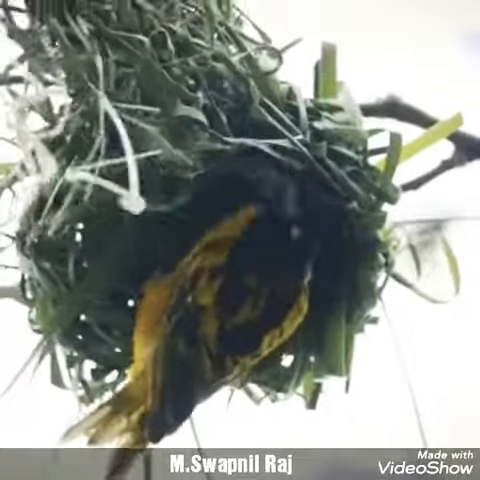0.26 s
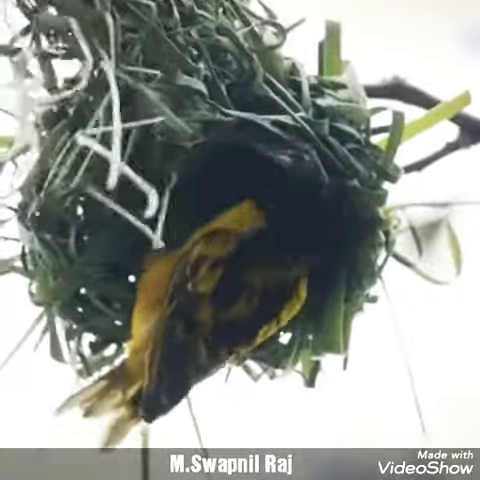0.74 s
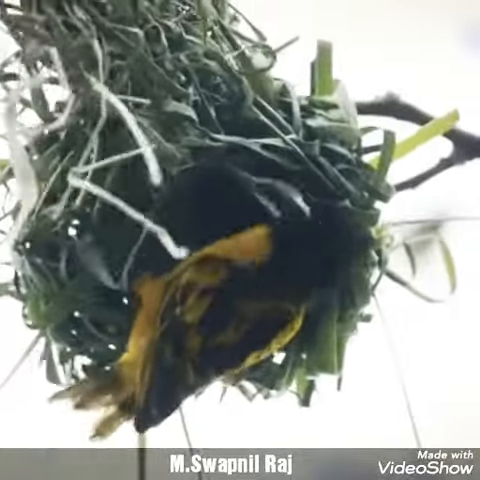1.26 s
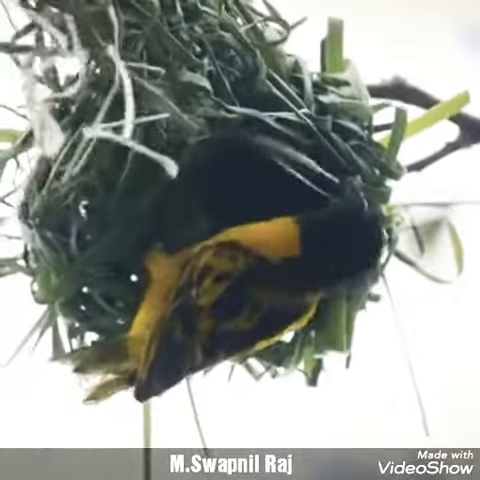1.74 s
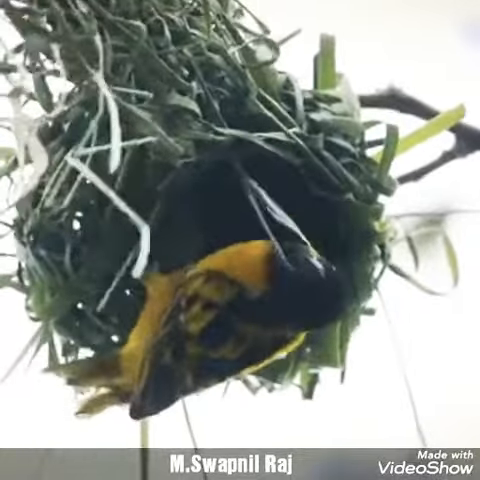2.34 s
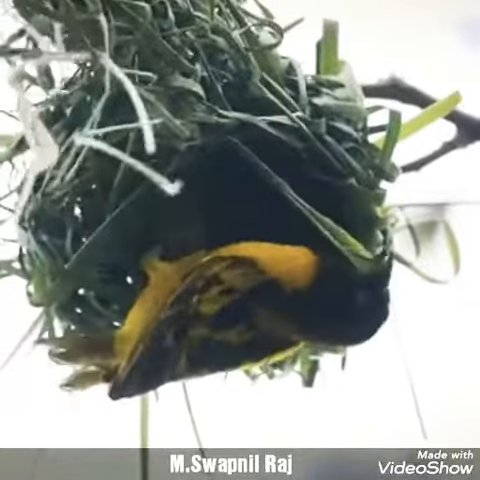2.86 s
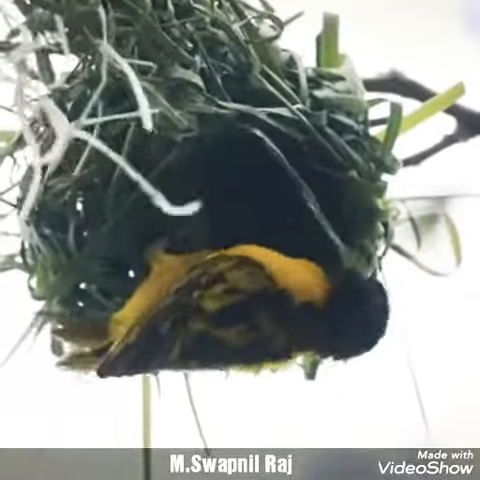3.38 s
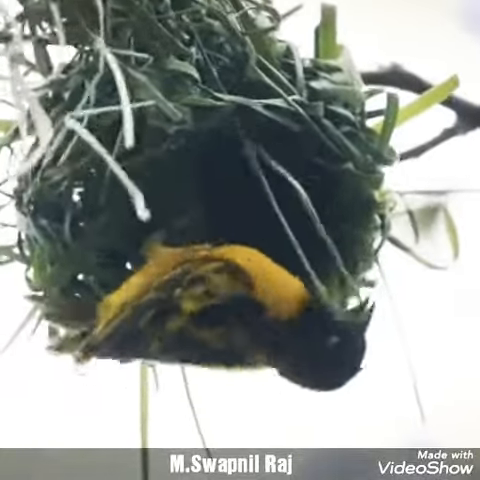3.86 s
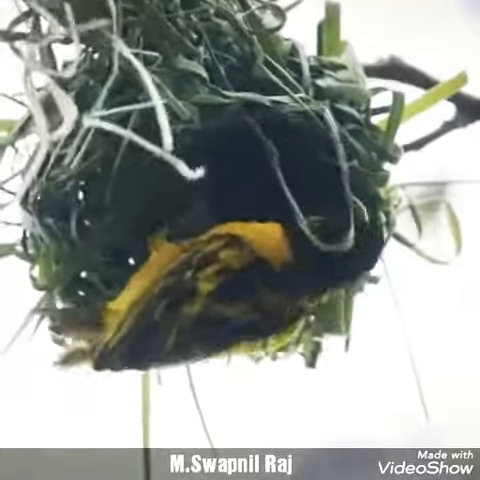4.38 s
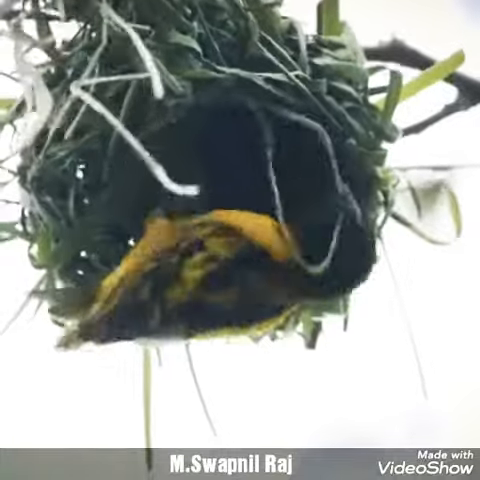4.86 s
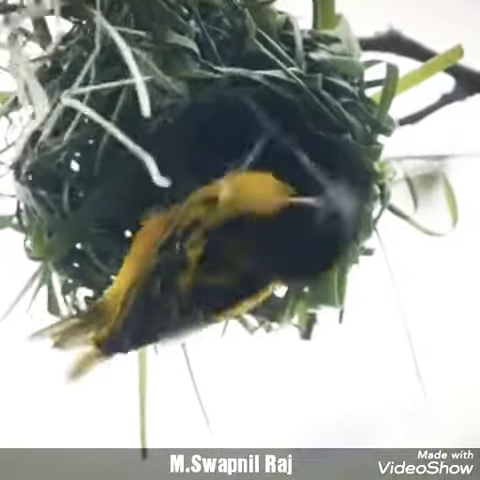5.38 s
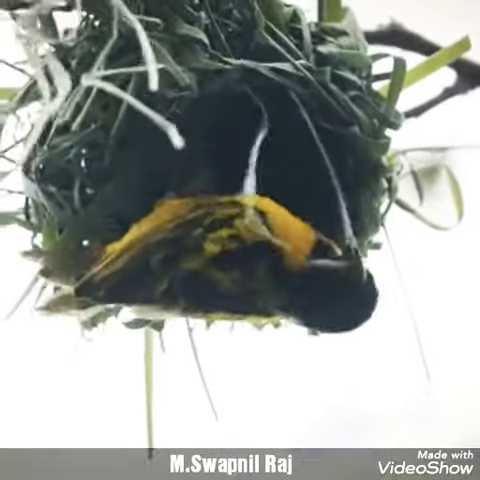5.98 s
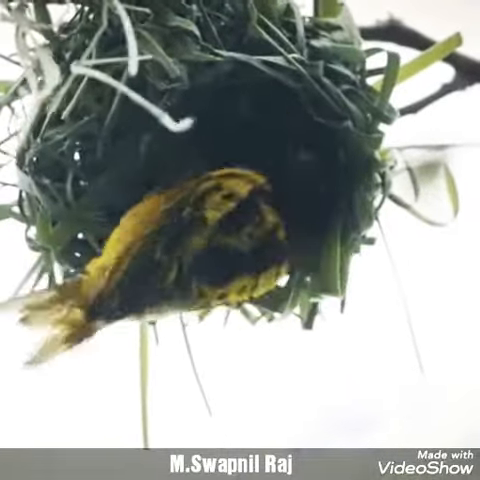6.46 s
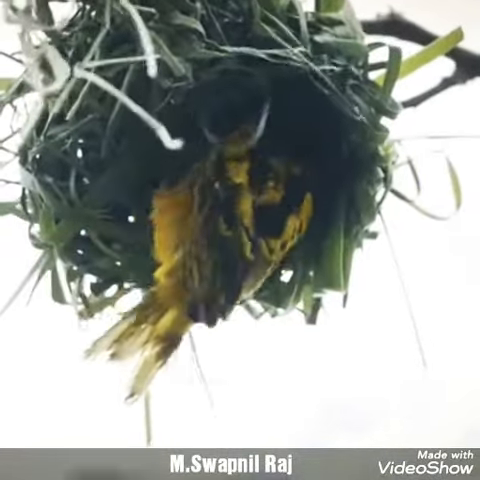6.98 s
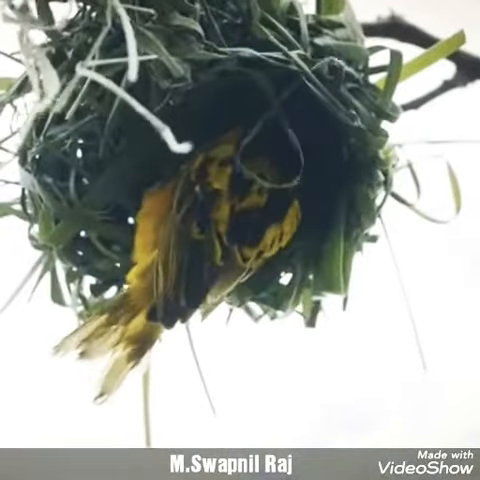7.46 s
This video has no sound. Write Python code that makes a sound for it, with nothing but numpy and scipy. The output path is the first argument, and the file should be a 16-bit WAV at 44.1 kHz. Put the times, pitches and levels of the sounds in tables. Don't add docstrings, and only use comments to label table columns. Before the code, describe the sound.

A busy colony of small weaver birds, heard outdoors in a tree over dull town rumble and far twittering. From 0 to 1.4 s, thin falling chirps, ticks and scratchy rasps squabble while a distant motor hum fades, gone by about 1.9 s. Between 1.4 and 1.9 s come four pure, nearly level whistles, rising slightly from one to the next. From 2 to 3.5 s reedy chirps and hoarse bursts tumble together, far birds swell near 2.9 s, and a short wing puff snaps at 3.1 s, another at 3.7 s. A thin whistle wavers from 3.8 to 4.2 s. Rasps, ticks and short whistles crowd in until 6 s. From 6.2 to 7.1 s, five brighter whistles each break into a shake and rasp; scratchy chirps close by 7.7 s. Leaves briefly echo the calls. Everything is on the left; the right has faint hiss.

```python
import sys
import numpy as np
from scipy import signal
from scipy.io import wavfile
from scipy.ndimage import uniform_filter1d

SR = 44100
rng = np.random.default_rng(int(sys.argv[2]) if len(sys.argv) > 2 else 0)


def decibels_to_gain(level_db):
    exponent = np.asarray(level_db, float) / 20
    return 10 ** exponent


def output_pcm(signal):
    pcm = np.clip(np.atleast_2d(signal).T, -1, 1) * 32767
    wavfile.write(sys.argv[1], SR, np.round(pcm).astype(np.int16))


N = 340893


def rms_one(x):
    return x / np.sqrt(np.mean(x ** 2) + 1e-20)


def drift(rate_hz, size):
    r = np.exp(-2 * np.pi * rate_hz / SR)
    warm_up = 3000
    noise = rng.standard_normal(size + warm_up)
    return rms_one(signal.lfilter([1], [1, -2 * r, r * r], noise)[warm_up:])


def band(x, low_hz, high_hz):
    sections = signal.butter(2, [low_hz, min(high_hz, .45 * SR)], "band", fs=SR, output="sos")
    return signal.sosfilt(sections, x)


def add(out, start_s, x):
    at = max(round(start_s * SR), 0)
    out[at:at + len(x)] += x[:N - at]


def swell(size, rise_s, fall_s):
    t = np.arange(size) / SR
    ramp = np.minimum(t / rise_s, t[::-1] / fall_s)
    return np.sin(np.pi / 2 * np.clip(ramp, 0, 1)) ** 2


def sweep(hz):
    return 2 * np.pi * np.cumsum(hz) / SR


HISS_DB = -63.5


def hiss():
    white = rng.standard_normal(N)
    coloured = white + decibels_to_gain(3) * band(white, 6100, 18000) + decibels_to_gain(5) * band(white, 12, 70)
    return decibels_to_gain(HISS_DB - 2.5) * coloured


# pitch_hz, level_db (per Hz)
TOWN_SPECTRUM = [(15, -58), (25, -24), (59, -19), (129, -2.5), (233, 3), (349, 1), (1380, -11.5),
                 (2170, -11), (3000, -16.5), (6050, -14), (7700, -22.5), (8810, -12), (13500, -38),
                 (15500, -34.5)]
RUMBLE_DB = -41.5


def rumble(patchy_db=1.75):
    out = 0
    edges_hz = 22 * 2 ** (np.arange(30) / 3)
    white = rng.standard_normal((2, N))
    hz, db = np.transpose(TOWN_SPECTRUM)
    for k, (low, high) in enumerate(zip(edges_hz, edges_hz[1:])):
        level_db = np.interp(np.log(low * high) / 2, np.log(hz), db)
        flicker = np.repeat(drift(300, size=N // 50 + 1), 50)[:N]
        out = out + decibels_to_gain(level_db + patchy_db * flicker) * band(white[k % 2], low, high)
    return decibels_to_gain(RUMBLE_DB + 5.5) * rms_one(out)


def hum():
    fade = np.clip(1 - (np.arange(N) / SR / 1.9) ** 2, 0, 1)
    phase = sweep(290 * (1 + .012 * drift(8, size=N)))
    level = decibels_to_gain(-43.5 + 1.2 * drift(6, size=N))
    return level * fade * (np.sin(phase) + decibels_to_gain(-7) * np.sin(2 * phase))


ECHO_T60_S, ECHO_DB = 0.17, -10.5


def leaves(x):
    t = np.arange(round(.4 * SR)) / SR
    tail = band(rng.standard_normal(len(t)), 1200, 7560)
    tail = tail * decibels_to_gain(-60 * t / ECHO_T60_S) * np.clip(t / 0.0026, 0, 1)
    return signal.fftconvolve(x, tail / np.sqrt(np.sum(tail ** 2)))[:N]


# start_s, level_db
FAR_BIRDS = [
    (0.0, -45),
    (2.86, -41),
    (3.77, -52.5),
    (3.9, -49.5),
    (5.53, -38.5),
    (5.73, -50),
    (6.63, -39.5),
    (6.85, -64),
    (7.73, -39),
]


def twitter(count=1500):
    out = np.zeros(N)
    for when, pitch, bend, span, size_db in rng.random((count, 5)):
        u = np.linspace(0, 1, round((0.00626 + 0.0312 * span ** 2) * SR))
        glide = 1 + .8 * (bend - .5) * u - .18 * (2 * u - 1) ** 2
        hz = 2800 * 2.6 ** pitch ** 1.2 * glide
        add(out, when * N / SR, decibels_to_gain(6.3 * size_db) * np.sin(np.pi * u) * np.sin(sweep(hz)))
    start_s, level_db = np.transpose(FAR_BIRDS)
    level_db = np.interp(np.arange(N) / SR, start_s, level_db)
    return decibels_to_gain(level_db + 4.5) * rms_one(out + 9.2 * leaves(out))


# start_s, level_db
WING_SNAPS = [
    (3.056, -26.5),
    (1.8, -36),
    (3.726, -33),
    (1.9, -36),
]


def snaps(length_s=.024):
    out = np.zeros(N)
    for start_s, level_db in WING_SNAPS:
        puff = band(rng.standard_normal(round(length_s * SR)), 800, 7100)
        puff = rms_one(band(puff, 700, 9500))
        add(out, start_s, decibels_to_gain(level_db) * swell(len(puff), 0.0033, 0.015) * puff)
    return out


# start_s, pitch_hz, level_db
LONG_WHISTLE = [
    (3.81, 3100, -56),
    (3.82, 3090, -48),
    (3.936, 3038, -39),
    (3.956, 2980, -37),
    (3.99, 2940, -31),
    (4.002, 3090, -39),
    (4.038, 3002, -41),
    (4.158, 2934, -37),
    (4.195, 2950, -43),
]


def whistle():
    start_s, pitch_hz, level_db = np.transpose(LONG_WHISTLE)
    t, out = np.arange(start_s[0], start_s[-1], 1 / SR), np.zeros(N)
    phase = sweep(np.interp(t, start_s, pitch_hz) * (1 + .005 * drift(120, size=len(t))))
    level = decibels_to_gain(np.interp(t, start_s, level_db) + 5.5 + .8 * drift(60, size=len(t)))
    add(out, start_s[0], level * swell(len(t), .01, .008) * np.sin(phase))
    return out


# start_s, pitch_hz (middle), level_db
TICKS_UP = [(0.46, 3800, -30.5), (1.306, 5700, -32), (2.698, 4300, -27), (2.771, 4300, -28),
            (3.23, 4000, -35), (3.144, 5800, -28), (.21, 4700, -32), (3.312, 4570, -29), (4.429, 5500, -38),
            (4.521, 4700, -36), (3.7, 4800, -30), (5, 4500, -31.5), (4.89, 5100, -30.5), (4.947, 5000, -26),
            (5.11, 4530, -33), (5.115, 5800, -34), (5.172, 4700, -21.5), (5.357, 4100, -32.5),
            (5.8, 4700, -31), (5.557, 4800, -36), (6.4, 5500, -31), (1.005, 5500, -32), (1.335, 6600, -37),
            (5.642, 5200, -27.5), (6.9, 5320, -28.5), (2.258, 5200, -31), (2.527, 6900, -38),
            (2.419, 6700, -39), (4.311, 5000, -37), (4.612, 5500, -38), (7.537, 6100, -35),
            (7.357, 4330, -29), (5.713, 4700, -34)]
# start_s, pitch_hz (middle), level_db
TICKS_DOWN = [(1.015, 5400, -33), (1.239, 6900, -30), (1.347, 6500, -34), (1.356, 6200, -31.5),
              (1.376, 6400, -36), (2.609, 6750, -41.5), (2.268, 5460, -31.5), (4.399, 4000, -32),
              (4.705, 5240, -30), (3.153, 5540, -31.5), (3.174, 5700, -40), (4.956, 4440, -37),
              (4.963, 3640, -32), (5.18, 5130, -30), (5.347, 3900, -31), (5.479, 5460, -37),
              (5.521, 6500, -37), (6.372, 4000, -34.5)]
UP_HZ_PER_MS, DOWN_HZ_PER_MS = 325, -310


def flicks(length_s=0.008):
    rows = [(s, hz, UP_HZ_PER_MS, db) for s, hz, db in TICKS_UP]
    rows += [(s, hz, DOWN_HZ_PER_MS, db) for s, hz, db in TICKS_DOWN]
    out, t = np.zeros(N), np.arange(-length_s / 2, length_s / 2, 1 / SR)
    for start_s, pitch_hz, slope, level_db in rows:
        phase = 2 * np.pi * (pitch_hz * t + 500 * slope * t ** 2)
        tone = np.sin(phase) + decibels_to_gain(-17.0) * np.sin(2 * phase)
        level = decibels_to_gain(level_db + 7.0 + 2.5 * drift(400, size=len(t)))
        add(out, start_s - length_s / 2, level * np.hanning(len(t)) * tone)
    return out


SCOOP, SCOOP_S, SCOOP_RISE_S = .5, .0038, .012
SWELL_DB, SWELL_PEAK = 3.5, 0.29


def notes(rows, scooped, octave_db, third_db, waver, flutter_db, edge_s=0.0055, peak=SWELL_PEAK):
    out, wobble, breath = np.zeros(N), drift(250, size=N), drift(44, size=N)
    for start_s, length_s, start_hz, middle_hz, end_hz, level_db in rows:
        size = round((length_s + edge_s) * SR)
        u = np.linspace(-1, 1, size)
        tilt = (end_hz - start_hz) / 2
        bow = (end_hz + start_hz) / 2 - middle_hz
        hz = middle_hz + tilt * u + bow * u ** 2
        rise_s = edge_s
        if scooped:
            rise_s = SCOOP_RISE_S
            hz = hz * (1 - SCOOP * np.exp(-np.arange(size) / SR / SCOOP_S))
        at = min(round(start_s * SR), N - size)
        phase = sweep(hz * (1 + waver * wobble[at:at + size]))
        overtones = decibels_to_gain(octave_db) * np.sin(2 * phase)
        overtones += decibels_to_gain(third_db) * np.sin(3 * phase) + decibels_to_gain(third_db - 2) * np.sin(4 * phase)
        tone = np.sin(phase) + overtones * (middle_hz < 4600)
        effort_db = flutter_db * breath[at:at + size] - SWELL_DB * (u - peak) ** 2
        envelope = decibels_to_gain(level_db + 7.0 + effort_db) * swell(size, rise_s, 0.41 * edge_s)
        add(out, start_s - rise_s / 2, envelope * tone)
    return out


def shaped(rows, shape):
    return [(s, length, *(hz * np.array(shape)), db) for s, length, hz, db in rows]


def slid(rows):
    return [(s, length, start, (start + end) / 2, end, db) for s, length, start, end, db in rows]


# start_s, length_s, pitch_hz (top), level_db
THIN_ARCHES = [
    (1.881, 0.055, 4380, -34),
    (5.428, .07, 7400, -37),
    (5.252, 0.0094, 4900, -26),
    (5.334, 0.02, 3640, -34),
    (6.545, 0.0136, 3700, -35),
]
# start_s, length_s, pitch_hz (middle), level_db
THIN_HOOKS = [
    (.234, 0.056, 4110, -34),
    (4.275, 0.023, 3310, -38),
    (4.997, 0.0164, 5200, -34),
    (5.021, 0.0134, 5120, -31.5),
    (4.333, 0.013, 4850, -37.5),
    (4.524, 0.0208, 4940, -33),
    (4.585, 0.027, 3510, -45),
    (5.561, 0.0146, 5320, -29),
    (7.43, 0.0166, 5280, -34.5),
    (7.671, 0.0176, 5700, -27.5),
]
# start_s, length_s, start_hz, end_hz, level_db
FALLING_SLIDES = [(.001, .079, 4600, 3600, -37.5), (.14, .054, 4350, 3680, -44),
                  (.173, .03, 7600, 6300, -48), (.288, 0.071, 4620, 3530, -35.5),
                  (.589, .043, 4100, 3390, -40), (.96, .035, 4270, 3600, -42),
                  (1.22, .035, 5560, 4080, -39), (1.931, 0.036, 4200, 3000, -42),
                  (2.28, 0.12, 5550, 4940, -30), (2.776, .016, 5600, 3980, -27),
                  (4.892, .025, 4350, 3860, -33), (5.117, 0.023, 4300, 3900, -29.5),
                  (5.268, 0.014, 3750, 3190, -25), (5.584, .025, 4350, 3810, -33),
                  (6.965, .007, 5600, 4300, -34), (6.971, 0.03, 4170, 3750, -29.5),
                  (7.15, .045, 3300, 3000, -46), (7.478, .018, 2900, 1700, -41),
                  (7.484, .014, 7000, 5200, -39), (6.434, 0.0085, 5000, 4220, -29)]
# start_s, length_s, start_hz, end_hz, level_db
STRAIGHT_STROKES = [(4.75, .11, 1820, 1800, -54), (1.263, .025, 3700, 3800, -41),
                    (1.485, .036, 6300, 7000, -37), (2.59, 0.0296, 4300, 4700, -40),
                    (2.572, .042, 5300, 5200, -40), (2.678, .007, 2900, 3700, -25.5),
                    (4.782, .03, 3500, 3450, -40), (5.2, .45, 2750, 2700, -46), (6.135, 0.04, 3400, 3750, -40),
                    (6.487, 0.067, 3950, 4700, -41.5), (5.668, .04, 6750, 5900, -37),
                    (6.672, .062, 3850, 3950, -39.5), (7.333, .02, 3500, 3400, -30.5),
                    (7.222, 0.062, 3700, 3950, -39.5), (1.805, 0.081, 3900, 4400, -47),
                    (2.18, .035, 4900, 4500, -44), (2.4, .045, 3250, 3150, -47), (4.425, .02, 4400, 4800, -38),
                    (4.445, .012, 4800, 6600, -41), (4.457, 0.031, 6750, 6650, -41),
                    (7.508, .016, 2100, 2350, -40), (7.661, .012, 3700, 5100, -37.5),
                    (7.67, .016, 9200, 8800, -37), (2.5, 0.0097, 2700, 4700, -37),
                    (2.04, .012, 6500, 8000, -40), (6.482, .012, 5000, 5800, -30.5),
                    (7.016, 0.011, 3500, 6400, -33),
                    (0.91, 0.016, 4000, 5600, -37), (0.941, .02, 6800, 7140, -39),
                    (1.018, 0.033, 3500, 4180, -39), (1.052, 0.038, 4250, 4170, -40),
                    (1.285, 0.04, 3900, 4400, -42.5), (.068, 0.019, 3500, 3000, -40.5),
                    (.2, .018, 3300, 3100, -41), (0.419, .012, 3900, 3200, -37),
                    (0.617, .012, 3800, 3300, -40), (2.627, .017, 2950, 5520, -32.5),
                    (2.645, 0.0173, 5500, 4100, -26), (2.645, .015, 3500, 4130, -33),
                    (2.673, .006, 4000, 2870, -30), (2.683, 0.0042, 3700, 2610, -32),
                    (2.66, 0.031, 4740, 4700, -35), (2.71, 0.033, 4300, 4130, -34),
                    (3.101, .06, 3050, 2700, -48), (3.196, .008, 3200, 4800, -37),
                    (3.202, .006, 4800, 5250, -38), (4.113, 0.019, 2900, 3580, -40),
                    (4.171, 0.031, 1250, 1700, -46), (5.059, .018, 2120, 3610, -37),
                    (5.074, 0.011, 3690, 3300, -37), (5.088, 0.01, 2780, 3210, -39),
                    (5.476, 0.011, 3170, 5400, -33), (5.52, .03, 1970, 3190, -48),
                    (5.568, .01, 4530, 4950, -33), (5.646, 0.011, 5500, 2990, -35),
                    (5.699, .015, 3290, 5480, -34), (5.745, .015, 3570, 5070, -40),
                    (5.982, .015, 4150, 5400, -33), (6.152, .02, 1900, 3600, -40)]
# start_s, length_s, pitch_hz (top), level_db
FALLING_ARCHES = [
    (3.367, .032, 3350, -31),
    (3.918, 0.052, 1610, -44.5),
]
PEEP_SHAPE, HOOK_SHAPE, DROOP_SHAPE = (0.78, 1.001, 0.79), (.78, 1.001, 1.06), (.88, .98, .8)


def thin_calls():
    rows = shaped(THIN_ARCHES, PEEP_SHAPE) + shaped(THIN_HOOKS, HOOK_SHAPE)
    rows += slid(FALLING_SLIDES + STRAIGHT_STROKES) + shaped(FALLING_ARCHES, DROOP_SHAPE)
    return notes(rows, False, octave_db=-19, third_db=-38, waver=.013, flutter_db=1.8)


# start_s, length_s, pitch_hz (top), level_db
REEDY_ARCHES = [(.557, 0.036, 3180, -38), (.759, 0.036, 3114, -33.5), (1.206, 0.025, 3370, -29),
                (2.029, 0.026, 3365, -31.5), (2.447, 0.036, 3290, -33.5), (2.711, 0.034, 3350, -32),
                (2.822, 0.034, 2756, -37.5), (2.893, 0.042, 3000, -35.5), (3.726, .018, 3080, -50),
                (6.048, 0.039, 3310, -33.5), (7.194, .04, 3135, -33.5), (7.352, 0.038, 3230, -35),
                (6.342, .04, 2980, -41.5)]
# start_s, length_s, pitch_hz (middle), level_db
REEDY_CLIMBS = [
    (1.124, 0.029, 2615, -34),
    (2.36, 0.03, 2820, -36),
    (3.27, .038, 2730, -38),
]
ARCH_SHAPE = (.94, 0.99, .73)


def reedy_chirps():
    arches = shaped(REEDY_ARCHES, ARCH_SHAPE)
    climbs = shaped(REEDY_CLIMBS, HOOK_SHAPE)
    out = notes(arches, True, octave_db=-1, third_db=-22, waver=.007, flutter_db=1.5)
    return out + notes(climbs, False, octave_db=2, third_db=-19, waver=.012, flutter_db=3)


# start_s, length_s, pitch_hz, level_db
PURE_WHISTLES = [(.111, 0.029, 3870, -40.5), (.361, 0.029, 3980, -37.5), (.511, .034, 3795, -39.5),
                 (1.437, 0.037, 3465, -24.5), (1.541, 0.044, 3566, -24.5), (1.675, .049, 3666, -24),
                 (1.839, 0.05, 3700, -24), (4.69, 0.039, 3190, -31.5), (4.908, 0.037, 3350, -28.5),
                 (5.141, .052, 3640, -31), (5.877, .064, 3582, -27.5), (5.374, 0.04, 3720, -32),
                 (5.586, .025, 3503, -28.5), (5.663, 0.037, 3630, -30)]
# start_s, length_s, pitch_hz, level_db
BRIGHT_WHISTLES = [
    (6.193, 0.038, 3400, -25.5),
    (6.407, 0.055, 3410, -27),
    (6.614, 0.042, 3330, -25),
    (6.79, .056, 3367, -24.5),
    (7.018, 0.046, 3330, -28.5),
]
HELD_SHAPE, HELD_PEAK = (1, 1.001, 1.025), 0.51


def held_whistles():
    pure, bright = shaped(PURE_WHISTLES, HELD_SHAPE), shaped(BRIGHT_WHISTLES, HELD_SHAPE)
    out = notes(pure, True, octave_db=-16, third_db=-38, waver=.006, flutter_db=.9, peak=HELD_PEAK)
    return out + notes(bright, True, octave_db=-7, third_db=-30, waver=.007, flutter_db=.9, peak=HELD_PEAK)


def endings():
    return [(s + length, hz, db) for s, length, hz, db in PURE_WHISTLES + BRIGHT_WHISTLES]


THROAT_HZ, THROAT_OCTAVES = 4700, 0.5


def throat(hz):
    return np.exp(-(np.log2(hz / THROAT_HZ) / THROAT_OCTAVES) ** 2)


SHAKE_DB = 6


def twists(length_s=0.033, sink=16, swing=.12, rate_hz=56):
    rows = endings()
    out, t = np.zeros(N), np.arange(0, length_s, 1 / SR)
    for (start_s, hz, level_db), (rate, depth) in zip(rows, rng.uniform(.88, 1.12, (len(rows), 2))):
        shake = swing * depth * np.cos(2 * np.pi * rate_hz * rate * t)
        pitch = hz * np.exp(-sink * t + shake + 0.011 * drift(220, size=len(t)))
        phase = sweep(pitch)
        tone = throat(pitch) ** 0.33 * np.sin(phase)
        tone += decibels_to_gain(-10.5 + 13 * t / length_s) * throat(2 * pitch) ** 1.36 * np.sin(2 * phase)
        level = decibels_to_gain(level_db + SHAKE_DB + 2.2 * drift(170, size=len(t)))
        add(out, start_s - .002, level * swell(len(t), 0.00078, 0.013) * tone)
    return out


# start_s, length_s, level_db
SIZZLING_RASPS = [(.408, 0.074, -30.5), (.65, 0.047, -29), (.761, 0.058, -26), (.883, 0.065, -32),
                  (.973, 0.073, -24.5), (1.203, 0.043, -21.5), (1.298, 0.037, -32), (1.663, 0.041, -31),
                  (1.834, 0.046, -28.5), (2.039, 0.023, -24), (2.25, 0.039, -28.5), (2.318, 0.078, -25.5),
                  (2.458, 0.058, -37), (2.639, 0.081, -25.5), (2.761, 0.027, -29), (3.186, 0.061, -36),
                  (3.384, 0.06, -31.5), (3.912, 0.086, -28.5), (4.155, 0.083, -25), (4.987, 0.048, -30),
                  (5.244, 0.047, -20.5), (5.469, 0.041, -31), (5.72, 0.031, -27), (6.541, 0.052, -31),
                  (6.957, .053, -24.5), (7.504, 0.051, -26.5), (7.647, 0.049, -24.5)]
# start_s, length_s, level_db
PLAIN_RASPS = [(2.66, 0.047, -31), (2.74, 0.057, -28), (5.15, 0.056, -27), (5.6, 0.047, -27.5),
               (6.288, 0.023, -18.5), (.197, 0.021, -22.5), (.229, 0.063, -32), (1.09, 0.083, -21),
               (1.325, 0.058, -22.5), (2.069, 0.015, -17), (2.816, 0.076, -28), (3.136, 0.03, -27),
               (3.285, 0.039, -18.5), (4.517, 0.037, -25.5), (6.068, 0.022, -21), (6.404, 0.073, -23),
               (6.803, 0.047, -23), (7.008, 0.055, -21.5), (7.215, 0.05, -27.5)]
# start_s, length_s, level_db
MUFFLED_RASPS = [(2.715, 0.045, -29), (3.478, 0.049, -26), (3.725, 0.047, -21), (4.105, 0.064, -38.5),
                 (4.3, 0.028, -29), (4.4, 0.039, -35), (4.687, 0.036, -25.5), (4.787, 0.031, -32.5),
                 (4.881, 0.07, -20), (5.108, 0.027, -17.5), (5.133, 0.066, -20), (5.313, 0.079, -26.5),
                 (5.43, 0.03, -34), (5.562, 0.057, -22), (5.63, 0.049, -23), (5.976, 0.016, -23),
                 (.085, 0.037, -35.5), (7.34, 0.051, -23.5), (7.48, 0.038, -25.5)]
SHARP_DB, USUAL_DB, DULL_DB = -5, -9.5, -48
END_RASP_S, END_RASP_DB = 0.026, 3


def rasps(pulse_hz=950, jitter=.3, air=1.0, throat_hz=4300):
    kinds = [(SIZZLING_RASPS, SHARP_DB), (PLAIN_RASPS, USUAL_DB), (MUFFLED_RASPS, DULL_DB)]
    calls = [(*row, sizzle_db) for rows, sizzle_db in kinds for row in rows]
    calls += [(s, END_RASP_S, db + END_RASP_DB, USUAL_DB) for s, hz, db in endings()]
    out = np.zeros(N)
    rate = pulse_hz * np.exp(jitter * drift(300, size=N) + .25 * drift(12, size=N))
    cycles = np.cumsum(rate) / SR
    slaps = np.diff(np.floor(cycles), prepend=0) * decibels_to_gain(2.1 * rng.standard_normal(N))
    source = rms_one(slaps) + air * rng.standard_normal(N) * decibels_to_gain(0.46 * drift(220, size=N))
    edges = throat_hz * 2 ** np.linspace(-.8, .8, 8)
    hoarse = rms_one(sum(decibels_to_gain(4.5 * drift(25, size=N)) * band(source, *pair) for pair in zip(edges, edges[1:])))
    hoarse = rms_one(hoarse * decibels_to_gain(3.5 * drift(180, size=N)))
    hoarse += decibels_to_gain(-12.0) * rms_one(band(source, 1240, 2220))
    lurch = np.tanh(rms_one(band(drift(60, size=N), 20, 90)))
    phase = sweep(3600 * np.exp(.3 * lurch))
    warble = np.sin(phase) + decibels_to_gain(-15) * np.sin(2 * phase)
    warble = rms_one(warble * decibels_to_gain(4 * drift(60, size=N)))
    top = decibels_to_gain(-8.0 + 4.6 * drift(30, size=N)) * band(source, 9900, 12700)
    sizzle = rms_one(band(source, 8260, 9830) + top)
    for start_s, length_s, level_db, sizzle_db in calls:
        part = slice(round(start_s * SR), round((start_s + length_s + 0.016) * SR))
        call = hoarse[part] + decibels_to_gain(-9) * warble[part] + decibels_to_gain(sizzle_db) * sizzle[part]
        envelope = swell(len(call), 0.0059 + 0.16 * length_s, 0.038)
        add(out, start_s - .004, decibels_to_gain(level_db - 8.0) * envelope * call)
    return out


def scene():
    near = thin_calls() + held_whistles() + reedy_chirps()
    near += rasps() + flicks() + twists() + snaps() + whistle()
    left = near + decibels_to_gain(ECHO_DB) * leaves(near) + twitter() + rumble() + hum()
    return np.array([left, hiss()])


# pitch_hz, level_db (against its usual level)
SILENCE_LIMIT = [
    (2500, -22),
    (6500, -12),
    (9600, -3),
    (11000, 1),
    (14000, 2),
    (15600, 5),
]


def starved(x, size=1024):
    lead = size - 194
    k, n = np.arange(size)[:, None] + .5, np.arange(2 * size) + .5
    window = np.sin(np.pi * n / 2 / size)
    basis = np.sqrt(2 / size) * window * np.cos(np.pi / size * (n + size / 2) * k)
    count = N // size + 3
    padded = np.pad(x, (lead, count * size - lead - N)).reshape(count, size)
    lines = np.hstack([padded[:-1], padded[1:]]) @ basis.T
    lines = lines.reshape(count - 1, 64, 16)
    level_db = 10 * np.log10(np.mean(lines ** 2, axis=2) + 1e-20)
    loudness_db = level_db[:, 5:16].max(axis=1, keepdims=True)
    luck = uniform_filter1d(rng.standard_normal(level_db.shape), size=3, axis=0)
    hz = (np.arange(64) + .5) * SR / 128
    limit_db = np.interp(hz, *np.transpose(SILENCE_LIMIT)) + np.median(level_db, axis=0)
    limit_db = limit_db + .3 * (loudness_db - loudness_db.mean())
    kept = level_db + 9 * luck > limit_db
    frames = (lines * kept[:, :, None]).reshape(count - 1, size) @ basis
    halves = np.pad(frames[:, :size], ((0, 1), (0, 0))) + np.pad(frames[:, size:], ((1, 0), (0, 0)))
    return halves.ravel()[lead:lead + N]


def roll_off(x):
    return signal.sosfilt(signal.butter(12, 15740, fs=SR, output="sos"), x)


def record(dry):
    rounded = np.tanh(2 * dry[0]) / 2
    mix = np.array([starved(rounded), dry[1]])
    mix = signal.sosfilt(signal.cheby2(16, 70, 16000, fs=SR, output="sos"), mix)
    return roll_off(mix)


dry = scene()
out = record(dry)
output_pcm(out)
```